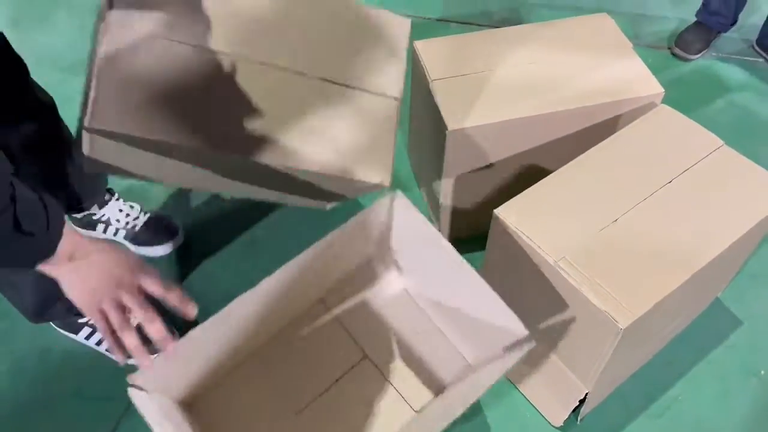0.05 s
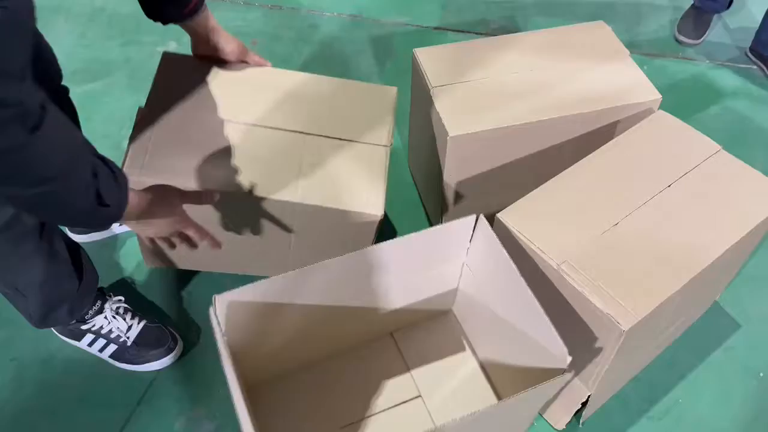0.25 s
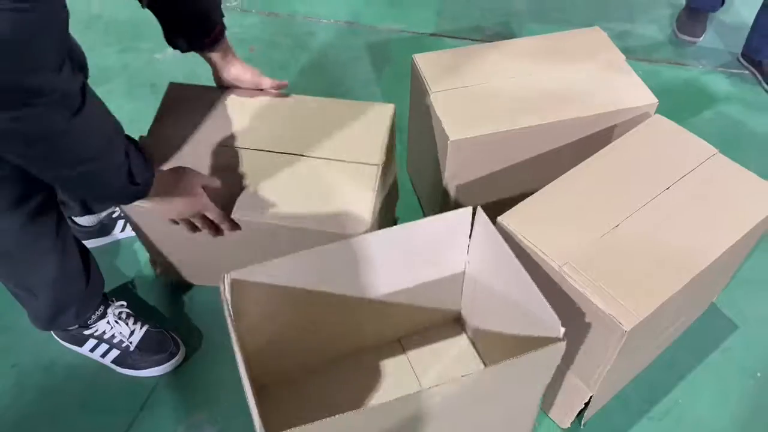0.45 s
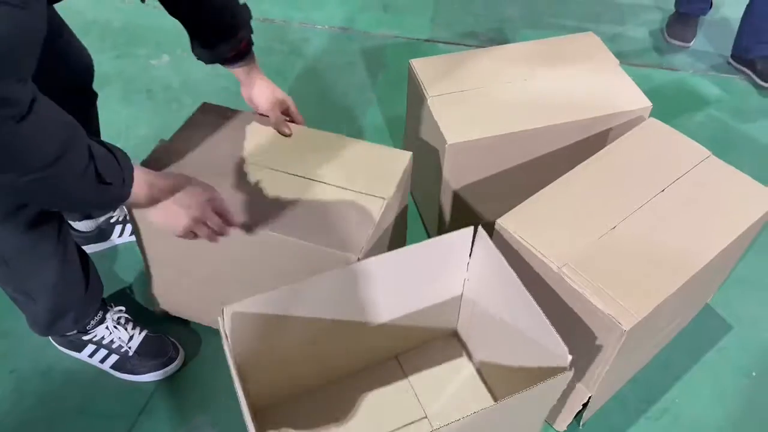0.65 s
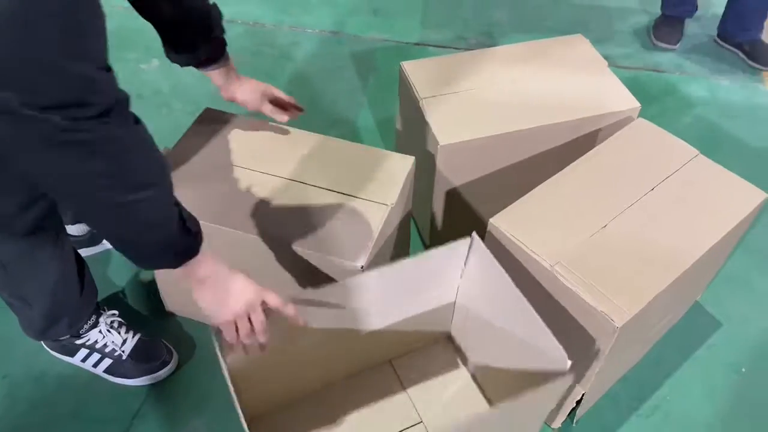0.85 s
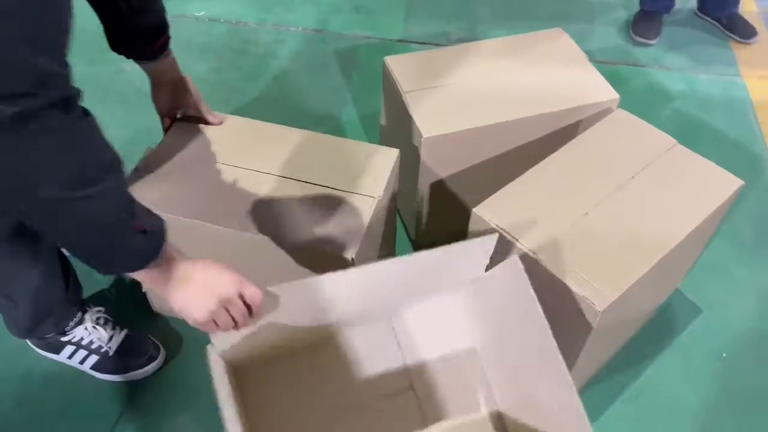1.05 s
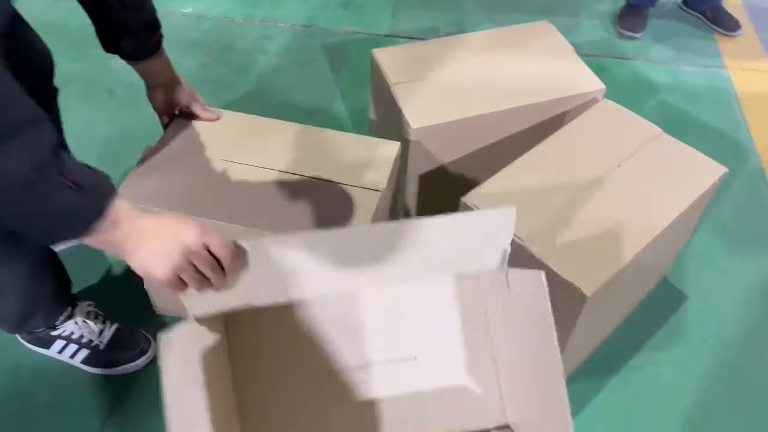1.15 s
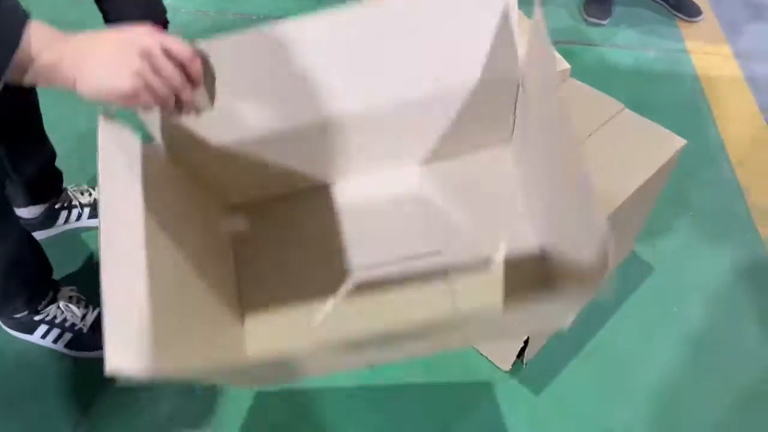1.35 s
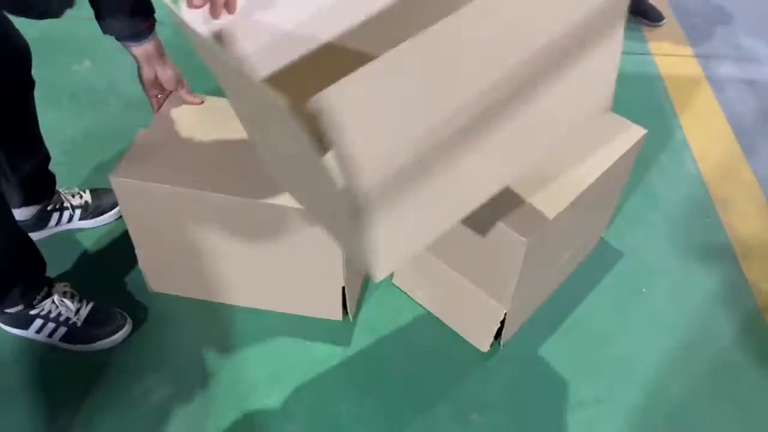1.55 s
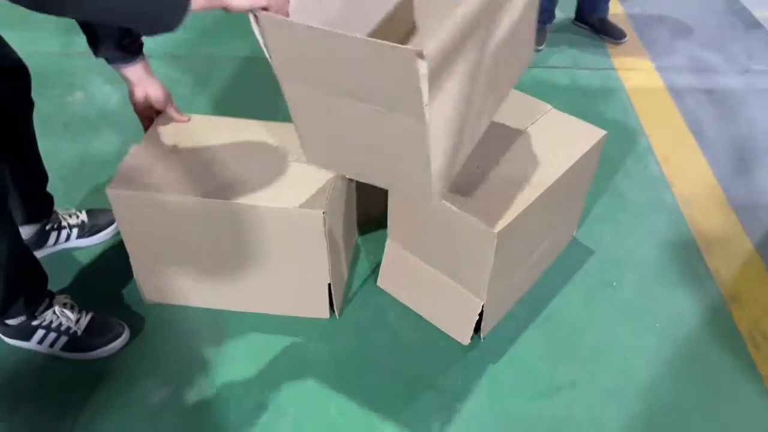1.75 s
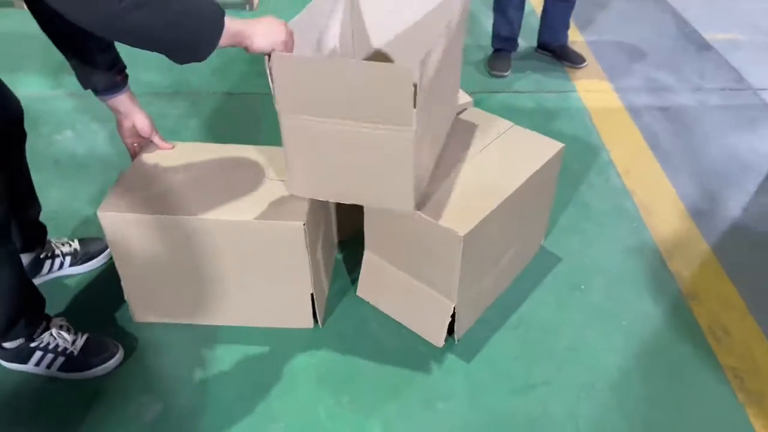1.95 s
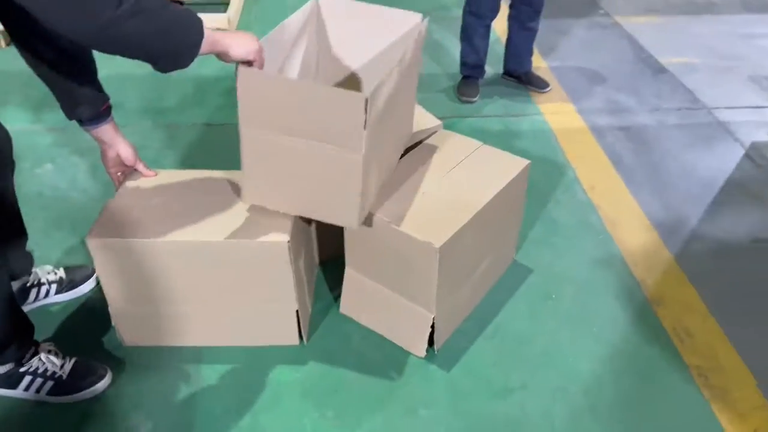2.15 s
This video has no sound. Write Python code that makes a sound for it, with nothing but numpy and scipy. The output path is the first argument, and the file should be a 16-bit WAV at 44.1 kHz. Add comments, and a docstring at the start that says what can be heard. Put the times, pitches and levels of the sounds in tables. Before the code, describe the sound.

Hollow cardboard boxes bump and rub on a hard factory floor, first a cluster of low thuds, then knocks with a flap buzz, a rising scrape-groan and a final double thump; short hall echo, faint machine rumble, close stereo pickup.

```python
"""Empty cardboard boxes, close to a two-port microphone, are set down, nudged, dragged and stacked
on the hard floor of a factory hall. Hollow panels thump as swelling, dying tones; paper skin scuffs in bursts
of grit; rubbing shudders by stick-slip jolts. A dragged panel groans and a loose flap buzzes.
In the distance machinery rumbles as shaped noise under a thin whistle; delay loops give the hall's short wash."""
import sys
import numpy as np
from scipy import signal
from scipy.fft import rfft, irfft
from scipy.io import wavfile

SR = 44100
rng = np.random.default_rng(int(sys.argv[2]) if len(sys.argv) > 2 else 0)


def unload_wav(signal):
    """Save mono or channel-first audio to the path in sys.argv[1] as 16-bit WAV at rate SR, clipped to [-1, 1]."""
    wavfile.write(
        sys.argv[1],
        SR,
        np.round(np.clip(np.atleast_2d(signal).T, -1, 1) * 32767).astype(np.int16),
    )


N = 97020

# Distant machinery spectrum: (frequency [Hz], level [dB per Hz])
MACHINES = [(15, -31), (25, 18.5), (306, -6), (369, -1), (471, -11.5), (724, -8), (807, -5.5), (1460, -27),
            (1620, -15), (1960, -42), (2640, -25), (12900, -43), (14000, -30), (14700, -47)]
MACHINES_DB, MACHINES_WAVER_DB = -38.5, 1.5
# Faint thin whistle: (time [s], level [dB])
WHISTLE = [(.17, -85), (.21, -63), (.54, -65), (.61, -85)]
WHISTLE_HZ, WHISTLE_WIDTH_HZ = 5580, 70
HALL_T60_S, HALL_DB, WALL_CUT_HZ = 0.46, -16.5, 3200

# Left-right likeness of spread noise: (frequency [Hz], correlation [-1 to 1])
LIKENESS = [(50, 1), (250, 0.6), (500, 0.09), (1000, 0.23), (4000, 0.3), (8000, 0.75), (12000, 0.82)]
# Paper rasp spectrum: (frequency [Hz], level [dB per Hz])
PAPER = [(530, 5), (900, 1), (1470, -0.5), (2100, -3), (3000, -7.5), (3930, -10), (5260, -13),
         (6000, -16.5), (8500, -23.5), (11000, -30), (18700, -120)]
# Top hiss spectrum: (frequency [Hz], level [dB per Hz])
HISS = [(4710, -43), (8000, -8), (10800, -4), (11700, -3), (12800, -5), (13900, -7), (14600, -20),
        (15600, -28)]
# Panel modes: (frequency [Hz], level [dB], decay by 60 dB [s])
PANEL = [(71, -7, 0.33), (132.7, 2, 0.11), (149, 2, 0.11), (205, 4, 0.03), (240.7, 0.5, 0.097),
         (286.8, -3.5, 0.095), (345, -9, 0.11), (410.7, -8.5, 0.092)]
# Stiff small modes of flaps and edges: (frequency [Hz], level [dB], decay by 60 dB [s])
EDGE = [(481.5, 2, 0.014), (680, -2, 0.022), (800, 3, 0.03), (1015, -5, 0.02), (1310, 0, 0.03),
        (1600, -1, 0.012), (2200, 10, 0.01)]

# Boxes rubbing: (time [s], panel shudder [dB], edge buzz [dB], paper rasp [dB], top hiss [dB])
RUB = [(0.0, -35, -43, -46.5, -57), (0.09, -39.5, -70.5, -50.5, -65.5), (0.2, -46, -75, -55.5, -71),
       (0.28, -24, -61, -39.5, -53), (0.37, -29.5, -44, -45, -56), (0.45, -35, -52, -55, -71),
       (0.65, -34, -81, -44, -55), (0.78, -31.5, -51, -43.5, -58), (0.91, -27.5, -45.5, -57.5, -69),
       (1.09, -40.5, -84, -46.5, -62.5), (1.27, -29.5, -57.5, -47.5, -62), (1.39, -41.5, -54.5, -62, -81),
       (1.47, -37, -57.5, -55.5, -66), (1.58, -45.5, -57.5, -55.5, -58.5), (1.68, -43.5, -56, -74, -82),
       (1.89, -36.5, -68, -44.5, -60.5), (2.05, -29, -70, -47, -60.5), (2.2, -44, -54, -51, -68)]
SLIPS_PER_S = 270
RASP_GRAINS_PER_S, RASP_SPREAD_DB, RASP_PATCHY_DB = 3500, 2.5, 2.5
# Groan of a dragged panel: (time [s], pitch [Hz], level [dB])
GROAN = [(1.1, 280, -31), (1.17, 290.5, -30.5), (1.25, 303.3, -24.5), (1.33, 332, -29.5), (1.36, 305, -35)]
GROAN_LOWER, GROAN_WOBBLE_DB = 0.8, 1  # second tone as a share of the pitch
# Loose flap buzzing: (time [s], level [dB])
FLAP = [(0.55, -64), (0.608, -56), (0.616, -35), (0.624, -42), (0.64, -41), (0.652, -50), (0.685, -40),
        (0.72, -54), (0.832, -67), (0.892, -58), (0.97, -56), (1.05, -70)]
FLAP_HZ, FLAP_WIDTH_HZ = 2160, 200

# Paper skin scuffs: (time [s], level before SCUFF_CREST_DB [dB], length [s], relative edge ring [dB],
# edge pitch [Hz], relative top hiss [dB], left over right [dB])
SCUFFS = [(0.2217, -22.5, 0.0025, -7, 663, -22, 1.5), (0.2308, -23.5, 0.015, 10, 616, -24.5, 2),
          (0.259, -36.5, 0.0036, -30.5, 786, -5, -3), (0.3128, -29.5, 0.0071, -26, 700, -22, 7),
          (0.372, -35.5, 0.027, -4, 1300, -39, 5), (0.421, -37.5, 0.0051, -2, 724, -15.5, 3),
          (0.511, -34.5, 0.012, -5, 496, -23, 4), (0.6095, -12, 0.00078, -37, 2020, -22, 3.5),
          (0.658, -26, 0.02, -29, 1310, -22, -2), (0.681, -19.5, 0.0041, -28, 820, -23.5, 6),
          (0.723, -34, 0.0034, 10.5, 501, -45, 10), (0.732, -31.5, 0.013, 8.5, 940, -29, 5),
          (0.767, -37.5, 0.003, 3, 700, -29, 9), (0.854, -37.5, 0.002, 0, 1930, -18, 1),
          (0.884, -26, 0.0077, -2, 1350, -23, 2), (0.904, -27, 0.0098, -7, 2080, -29, 3),
          (0.937, -36, 0.005, -14, 2200, -35, 5), (0.957, -50, 0.0025, -6, 2300, -34, 3),
          (0.9794, -46, 0.0037, -9, 640, -4, 0), (1.0734, -32.5, 0.027, 0.5, 570, -9.5, -1),
          (1.1026, -26, 0.0074, -3, 736, -23, 0), (1.153, -40, 0.0048, 8, 810, -16, 4),
          (1.195, -23.5, 0.0028, -12, 810, -27, 1), (1.225, -28, 0.0027, -4, 770, -24.5, 2),
          (1.33, -40, 0.016, -21, 496, -21, -1.5), (1.359, -40.5, 0.0012, 17.5, 770, -33, 7),
          (1.428, -37, 0.0036, -4, 1030, -21, 1.5), (1.655, -34, 0.0061, -9, 692, -20, 1),
          (1.8787, -28.5, 0.026, 0, 877, -20.5, 1), (1.9002, -23.5, 0.015, 1.5, 840, -26.5, -1),
          (1.956, -26.5, 0.0021, 8, 746, -18.5, 0.5), (2.0255, -24.5, 0.0063, -20, 833, -24, -0.5),
          (2.087, -32, 0.0081, 2.5, 730, -14.5, 1)]
GRAINS_PER_S = 4000
SCUFF_RISE_S, SCUFF_TAIL_S, SCUFF_CREST_DB = 0.0035, 0.006, -9
LINGER_DB, LINGER_S = -14, 0.029  # a fainter rustle follows each scuff
EDGE_REACH_OCT, EDGE_LUCK_DB = 0.85, 4  # each scuff strikes the edge modes differently

# Panels thump and edges knock: (time [s], peak level [dB], pitch of the part hit [Hz], decay by 60 dB [s])
THUDS = [(.227, -16.5, 249, 0.095), (.234, -15, 665, 0.028), (0.236, -18.5, 2240, 0.016),
         (0.241, -25.5, 61.6, 0.095), (.241, -28, 600, 0.026), (.242, -9, 255, 0.097),
         (.240, -18, 490, 0.063), (0.257, -13.5, 262.6, 0.21), (0.271, -32.5, 1500, 0.043),
         (0.273, -20, 291, 0.15), (.285, -13, 253, 0.11), (0.294, -19, 144, 0.082),
         (0.323, -48, 2930, 0.02), (0.333, -21.5, 116, 0.17), (.381, -18.5, 269, 0.11),
         (.404, -33, 692, 0.04), (0.408, -12, 187, 0.049), (0.442, -25, 119, 0.015),
         (0.611, -24, 470, 0.046), (0.612, -23, 207, 0.074), (0.621, -19.5, 242, 0.04),
         (.682, -23, 5950, 0.013), (0.6893, -2, 259.7, 0.08), (0.611, -32, 1284, 0.035),
         (0.691, -23.5, 850, 0.027), (0.708, -20, 230, 0.043), (.718, -11.5, 281, 0.031),
         (0.726, -7.5, 193.3, 0.057), (.742, -15, 252, 0.072), (0.753, -13, 231, 0.042),
         (0.775, -16.5, 237, 0.042), (0.836, -23.5, 269.5, 0.18), (.888, -19, 1830, 0.016),
         (0.907, -36, 1440, .015), (.909, -17.5, 436, 0.08), (0.911, -10.5, 270, 0.014),
         (0.917, -10.5, 135, 0.073), (0.9209, -9.5, 181, 0.033), (0.924, -17.5, 73, 0.058),
         (0.944, -26, 130, 0.022), (1.073, -22.5, 285, 0.13), (1.103, -30, 738, 0.12),
         (1.122, -16, 202, 0.017), (1.127, -27.5, 69.5, 0.27), (1.14, -21, 134, 0.24),
         (1.205, -17, 226, 0.029), (1.26, -23, 245.6, 0.19), (1.264, -19, 133, 0.12),
         (1.360, -29, 697, 0.043), (1.364, -10.5, 255.5, 0.048), (1.419, -26, 252, 0.087),
         (1.886, -11, 246.5, 0.28), (1.89, -22.5, 104, 0.11), (1.9, -9, 331, 0.065),
         (1.901, -13, 1620, 0.021), (1.903, -26, 792, 0.043), (1.909, -10.5, 369, 0.035),
         (1.92, -9, 207.4, 0.12), (1.942, -25, 61, 0.21), (1.951, -14, 292, 0.071),
         (1.973, -17, 112, 0.055), (1.984, -14.5, 200, 0.064), (2.030, -17, 270, 0.022),
         (2.04, -14, 196, 0.055), (2.086, -28.5, 1520, 0.022), (2.168, -29, 152, 0.044)]
RISE_CYCLES, REACH_OCT, NEIGHBOURS_DB = 0.57, 0.47, -9  # a thump swells; nearby modes join in
PANEL_LUCK_DB = 3.5  # each thump strikes the panel modes differently

# Microphone ports: (frequency [Hz], phase by which left leads [rad])
PORTS = [(0, 0), (1290, .6), (2150, 6.5), (3360, 9.6), (4050, 12.5), (5860, 16.3), (6290, 18.6),
         (6720, 18.4), (7670, 15.7), (8870, 15.5), (10500, 13.2), (13400, 11.5), (15300, 11)]
LOW_CUT_HZ, CUTOFF_HZ = 44, 15850


def from_db(db):
    """Amplitude ratio of a level in dB."""
    return 10 ** (np.asarray(db) / 20)


def rms_one(x):
    """Scale to an rms of 1."""
    return x / np.sqrt(np.mean(x ** 2) + 1e-20)


def in_time(rows):
    """Draw straight lines between timed rows, one curve per column."""
    s, *columns = np.transpose(rows)
    return [np.interp(np.arange(N) / SR, s, column) for column in columns]


def at_hz(points, hz):
    """Read a curve along a logarithmic frequency axis."""
    known_hz, values = np.array(points).T
    return np.interp(np.log(hz), np.log(known_hz), values)


def drift(rate_hz):
    """Slow random wander of spread 1: noise through two equal low-pass poles, one point per 40 samples."""
    pole = np.exp(-80 * np.pi * rate_hz / SR)
    noise = rng.standard_normal(N // 40 + 2002)
    slow = signal.lfilter([1], [1, -2 * pole, pole * pole], noise)[2000:]  # drop the settling
    return np.interp(np.arange(N) / 40, np.arange(len(slow)), rms_one(slow))


def ring(x, modes):
    """Drive parallel decaying resonances with alternating signs."""
    out = 0
    for k, (hz, db, t60) in enumerate(modes):
        radius, angle = from_db(-60 / (t60 * SR)), 2 * np.pi * hz / SR
        poles = [1, -2 * radius * np.cos(angle), radius * radius]
        tone = signal.lfilter([0, np.sin(angle)], poles, np.add(x, 1e-18))
        out = out + (-1) ** k * from_db(db) * tone
    return out


def grains(per_s, spread_db):
    """Random signed clicks of uneven size, rms 1."""
    size = from_db(spread_db * np.minimum(rng.exponential(1, N), 4)) * rng.choice([-1, 1], N)
    return rms_one(size * (rng.random(N) < per_s / SR))


def colour(x, spectrum):
    """Shape by a spectrum and spread left and right by likeness; rms 1."""
    hz = np.maximum(np.arange(N // 2 + 1) * SR / N, 1)
    lowest_hz = spectrum[0][0]
    low_cut = (hz > lowest_hz / 2) / (1 + (lowest_hz / hz) ** 8)
    gain = from_db(at_hz(spectrum, hz)) * low_cut
    alike = np.clip(at_hz(LIKENESS, hz), -1, 1)
    mid = rfft(x[0]) * gain * np.sqrt(1 + alike)
    side = rfft(x[1]) * gain * np.sqrt(1 - alike)
    return rms_one(irfft([mid + side, mid - side], N))


def narrow(curve, hz, width_hz):
    """Noise in one narrow resonance, sounding only along its curve."""
    db, = in_time(curve)
    t = np.arange(N) / SR
    t60 = np.log(1000) / np.pi / width_hz  # a narrower resonance rings longer
    tone = rms_one(ring(rng.standard_normal(N), [(hz, 0, t60)]))
    return from_db(db) * (t > curve[0][0]) * (t < curve[-1][0]) * tone


def machines():
    """Distant machinery: a broad noise rumble whose level wavers slightly."""
    level = from_db(MACHINES_DB + MACHINES_WAVER_DB * drift(9))
    return level * colour(rng.standard_normal((2, N)), MACHINES)


def whistle():
    """Thin narrow-band noise, opposite signs left and right before the ports' phase offset."""
    return narrow(WHISTLE, WHISTLE_HZ, WHISTLE_WIDTH_HZ) * [[1], [-1]]


def hall(x):
    """Six feedback delays a side, duller on every round."""
    out, dull = np.zeros((2, N)), np.exp(-2 * np.pi * WALL_CUT_HZ / SR)
    lags = (rng.uniform(0.015, 0.05, 12) * SR).astype(int)
    for k, lag in enumerate(lags):
        loop, gain, state = x.copy(), from_db(-60 * lag / SR / HALL_T60_S), [0.]
        for i in range(lag, N, lag):
            back, state = signal.lfilter([gain * (1 - dull)], [1, -dull], loop[i - lag:i], zi=state)
            loop[i:i + lag] += back[:N - i]
        out[k % 2] += (loop - x) * (-1) ** (k // 2)  # returns only
    return out


def rubbing():
    """Stick-slip jolts shake the panels and edges; fine grains rasp on the paper under noise hiss."""
    shudder_db, buzz_db, rasp_db, hiss_db = in_time(RUB)
    slips = grains(SLIPS_PER_S, 0.9)
    shudder = from_db(shudder_db + 2.5 * drift(68)) * rms_one(ring(slips, PANEL))
    edge_slips = [slips, grains(SLIPS_PER_S, 5.3)]  # left, right
    buzz = from_db(buzz_db + 1.2 * drift(28)) * rms_one(ring(edge_slips, EDGE))
    grit = [grains(RASP_GRAINS_PER_S, RASP_SPREAD_DB) for _ in range(2)]
    rasp = from_db(rasp_db + RASP_PATCHY_DB * drift(18.4)) * colour(grit, PAPER)
    hiss = from_db(hiss_db + 0.5 * drift(34)) * colour(rng.standard_normal((2, N)), HISS)
    return shudder + buzz + rasp + hiss


def groan():
    """Two wavering panel tones that climb as the dragged box tightens, then sink at the end."""
    hz, db = in_time(GROAN)
    t, out = np.arange(N) / SR, 0
    for share in (1, GROAN_LOWER):
        wavering_hz = share * hz * (1 + 0.0318 * drift(27))
        phase = 2 * np.pi * np.cumsum(wavering_hz) / SR
        out = out + from_db(db + GROAN_WOBBLE_DB * drift(38)) * np.sin(phase)
    return out * (t > GROAN[0][0]) * (t < GROAN[-1][0])


def loose_flap():
    """A loose flap's buzz: noise through one resonance."""
    return narrow(FLAP, FLAP_HZ, FLAP_WIDTH_HZ)


def scuffs():
    """Bursts of grit: rasp, top hiss and the ring of the nearest edge modes, each with rise, hold and tail."""
    t = np.arange(N) / SR
    rasp, hiss, edge = np.zeros((2, N)), np.zeros((2, N)), np.zeros((len(EDGE), 2, N))
    mode_hz = np.array(EDGE)[:, :1, None]
    lucks_db = rng.normal(0, EDGE_LUCK_DB, (len(SCUFFS), len(EDGE), 1, 1))
    for (s, db, length, ring_db, edge_hz, top_db, pan_db), luck_db in zip(SCUFFS, lucks_db):
        span = slice(int(s * SR), int((s + 0.15) * SR))
        age = t[span] - s
        rise = np.clip(age / SCUFF_RISE_S, 0, 1)
        tail = np.exp(-np.maximum(age - length, 0) / SCUFF_TAIL_S)
        rustle = from_db(LINGER_DB) * np.exp(-age / LINGER_S)
        pan = np.array([[0.5], [-0.5]]) * pan_db
        shape = rise * (tail + rustle) * from_db(db + SCUFF_CREST_DB + pan)
        rasp[:, span] += shape
        hiss[:, span] += shape * from_db(top_db + 9)
        distance = np.log2(mode_hz / edge_hz) / EDGE_REACH_OCT
        edge[:, :, span] += shape * from_db(ring_db + luck_db + 4.5 - 10 * distance ** 2)
    grit = grains(GRAINS_PER_S, 0.58)
    rings = sum(ring(drive * grit, [mode]) for drive, mode in zip(edge, EDGE))
    rings = rings / np.std(ring(grit, EDGE))
    paper = rasp * colour([grit, grains(GRAINS_PER_S, 0.7)], PAPER)
    return paper + hiss * colour(rng.standard_normal((2, N)), HISS) + rings


def thuds():
    """The part hit swells and dies at its own pitch; panel modes near it ring along, each with its own strength."""
    out, t = np.zeros(N + SR), np.arange(SR // 4) / SR
    hz, db, t60 = np.transpose(PANEL)[:, :, None]
    lucks_db = rng.normal(0, PANEL_LUCK_DB, (len(THUDS), len(PANEL), 1))
    for (s, level_db, pitch_hz, ring_s), luck_db in zip(THUDS, lucks_db):
        swell = 1 - np.exp(-(t * pitch_hz / RISE_CYCLES) ** 2)
        main = from_db(-60 * t / ring_s) * np.sin(2 * np.pi * pitch_hz * t)
        distance = np.log2(hz / pitch_hz) / REACH_OCT
        near = from_db(NEIGHBOURS_DB + db + luck_db - 10 * distance ** 2 - 60 * t / t60)
        body = swell * (main + (near * np.sin(2 * np.pi * hz * t)).sum(0))
        start = int(s * SR)
        out[start:start + len(t)] += from_db(level_db) * body / np.abs(body).max()
    return out[:N]


def scene():
    """Boxes close by, hall wash favouring scuffs and flap over thumps and groan, machines in the distance."""
    far = machines() + whistle()
    skin = scuffs() + loose_flap()
    body = thuds() + groan()
    wash = from_db(HALL_DB) * hall(skin.mean(0) + 0.53 * body)
    return far + wash + rubbing() + skin + body


def record(dry):
    """Two microphone ports with a phase offset; bass and top are cut."""
    long = np.pad(dry, [(0, 0), (2048, 2048)], "reflect")
    size = long.shape[1]
    lead = np.interp(np.arange(size // 2 + 1) * SR / size, *np.transpose(PORTS))
    turn = np.exp(0.5j * lead * [[1], [-1]])  # half the lead to each port
    wet = irfft(rfft(long) * turn, size)
    wet = signal.sosfilt(signal.butter(6, LOW_CUT_HZ, "high", fs=SR, output="sos"), wet)
    wet = signal.sosfilt(signal.cheby2(20, 70, CUTOFF_HZ, fs=SR, output="sos"), wet)
    return wet[:, 2048:-2048]


dry = scene()
out = record(dry)
unload_wav(out)
```